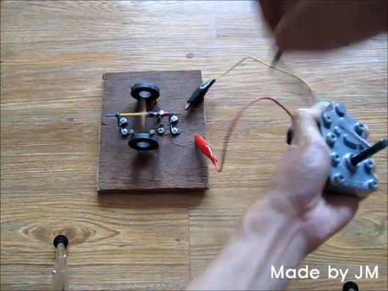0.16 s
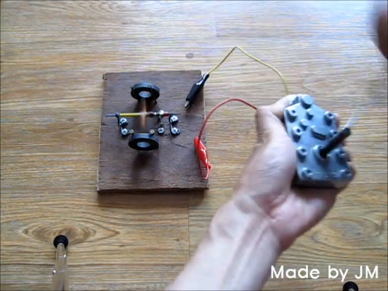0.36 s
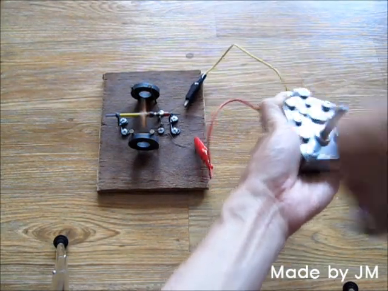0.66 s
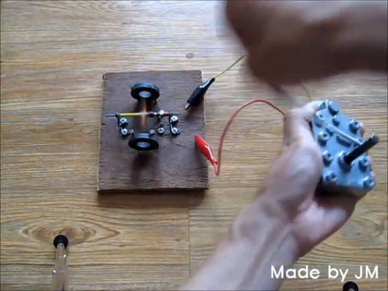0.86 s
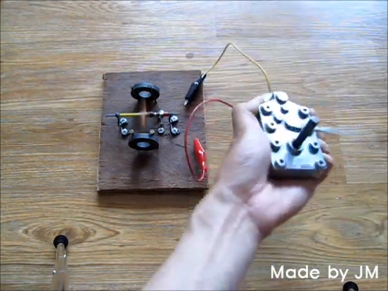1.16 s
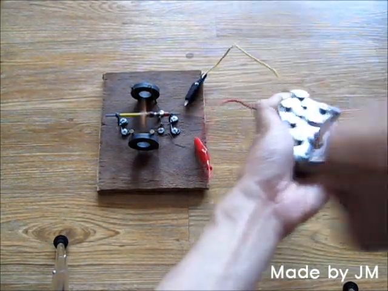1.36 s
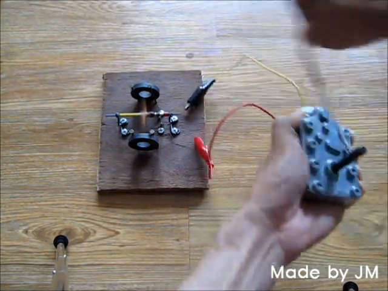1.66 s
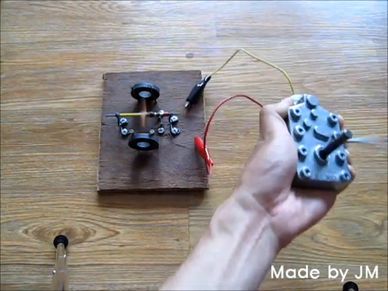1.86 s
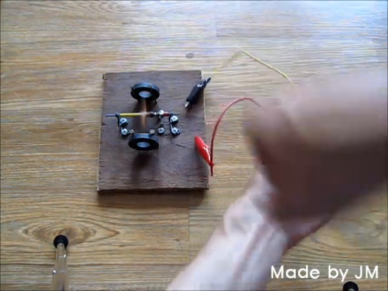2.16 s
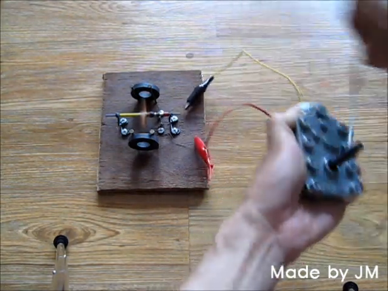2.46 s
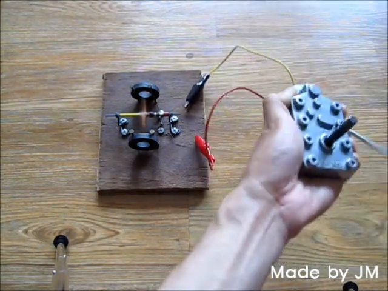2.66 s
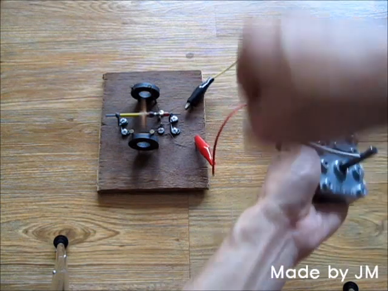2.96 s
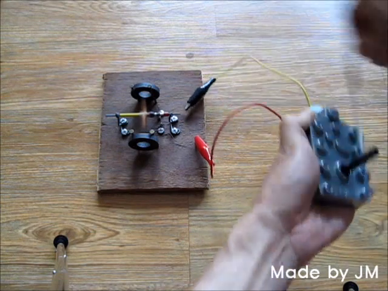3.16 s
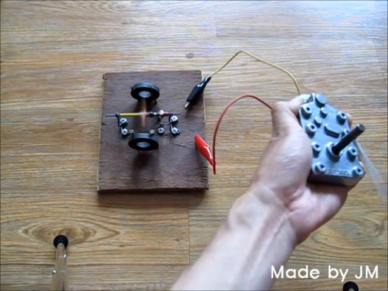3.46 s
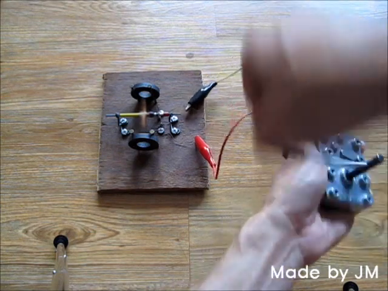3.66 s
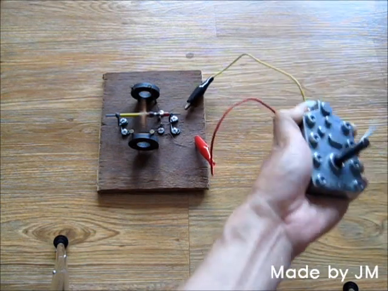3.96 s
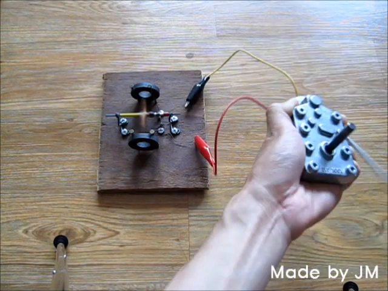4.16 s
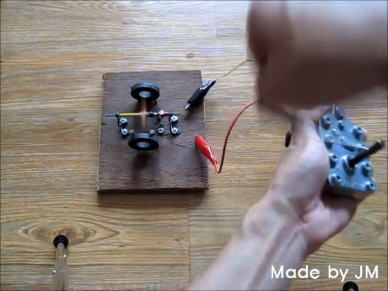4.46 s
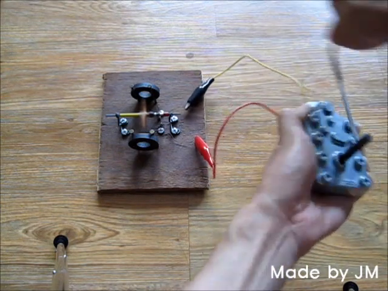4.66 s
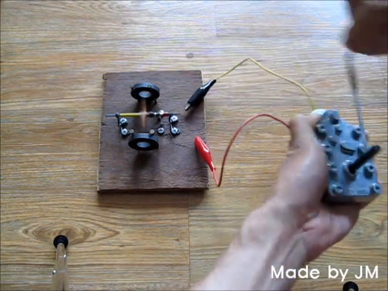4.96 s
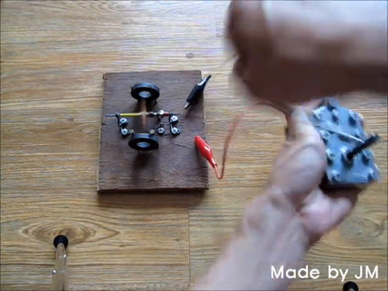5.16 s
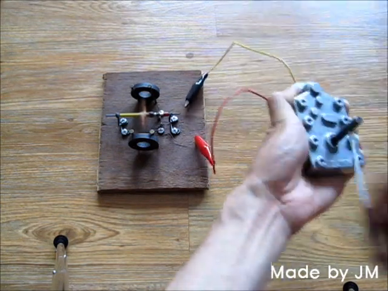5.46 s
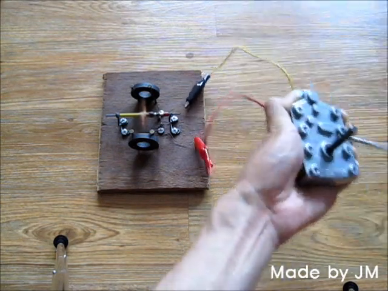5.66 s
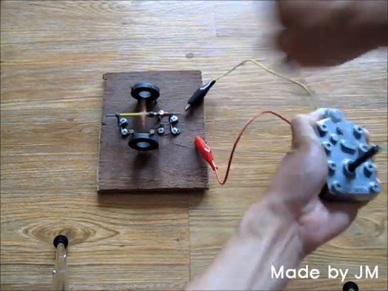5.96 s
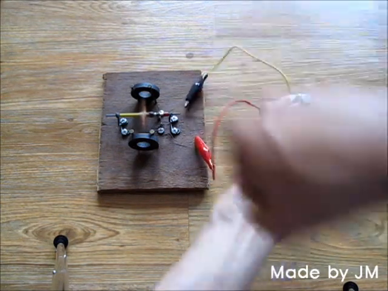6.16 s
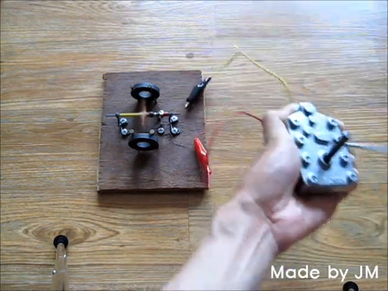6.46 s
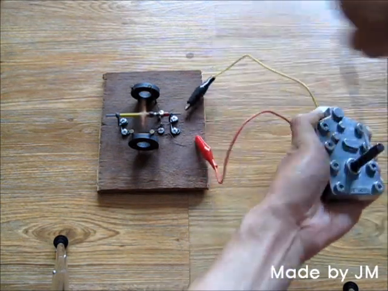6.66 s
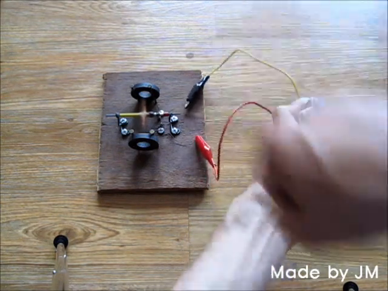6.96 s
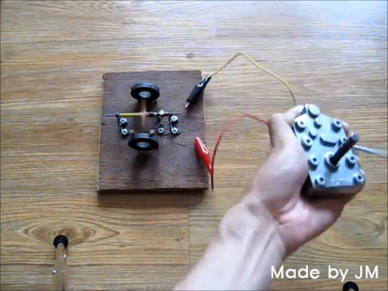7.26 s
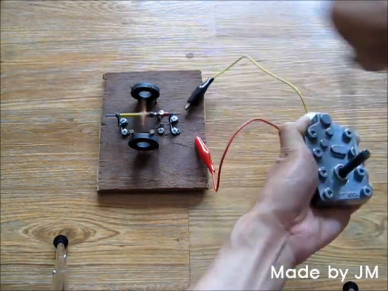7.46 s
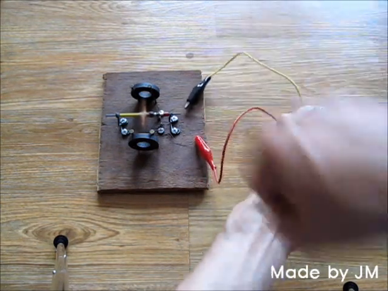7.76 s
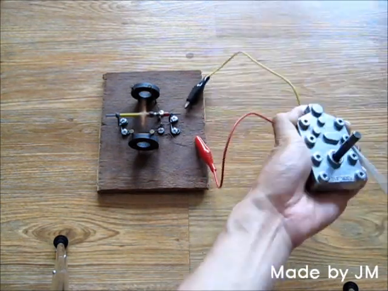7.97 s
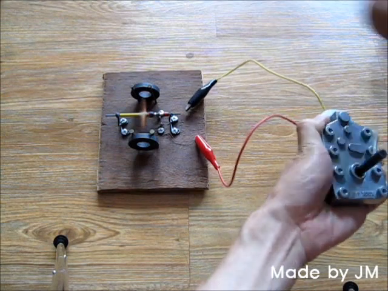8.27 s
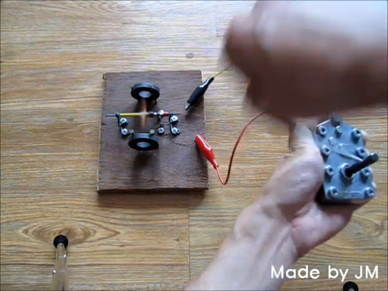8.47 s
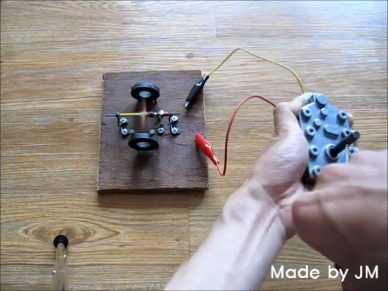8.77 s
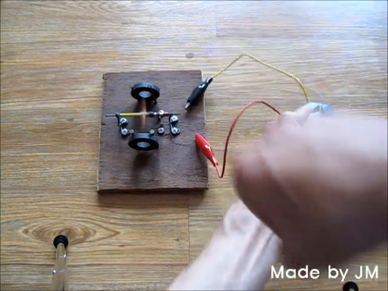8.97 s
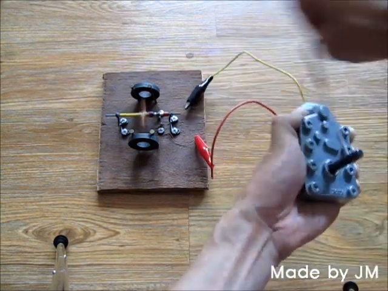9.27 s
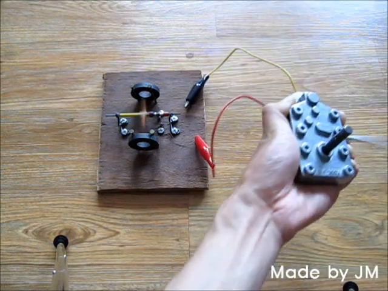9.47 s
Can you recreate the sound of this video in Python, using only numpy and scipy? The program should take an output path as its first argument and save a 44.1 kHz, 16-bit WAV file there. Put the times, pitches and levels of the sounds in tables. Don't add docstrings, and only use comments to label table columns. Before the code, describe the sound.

A small hand-cranked geared motor rattles and whirs up close, gears clattering with a metallic whine, easing off twice, in a quiet room.

```python
import sys
import numpy as np
from scipy import signal
from scipy.fft import rfft, irfft
from scipy.io import wavfile
from scipy.ndimage import uniform_filter1d

SR = 44100
rng = np.random.default_rng(int(sys.argv[2]) if len(sys.argv) > 2 else 0)


def pcm_store(signal):
    levels = np.round(np.clip(np.atleast_2d(signal), -1, 1) * 32767)
    wavfile.write(sys.argv[1], SR, levels.astype(np.int16).T)


def invert_db(level):
    return 10 ** (np.asarray(level, dtype=float) / 20)


N = 423342
REVERSAL_S = 5.2

# frequency in Hz, strength in dB per Hz.
ROOM = [(15, -36), (25, -1.5), (48, -3), (284, -9), (401, -6.5), (549, -9), (741, -7.5), (900, -3),
        (1170, -24), (1980, -120)]
# pitch in Hz, width in Hz, level in dB forward, level in dB backward.
BOARD = [(405.2, 31, -13, -8), (478, 20, -7.5, -16)]
# time in seconds, turns per second, share of smooth sliding noise from 0 to 1.
ROTOR = [(0, 29.4, 0.75), (.4, 31.3, 0.46), (1.2, 33, 0.58), (2.3, 40, 0.64), (4.4, 44.6, 0.5),
         (4.8, 37, 0.55), (5.03, 25.5, .45), (5.25, 24, 0.73), (5.33, 38.8, 0.18), (5.5, 44.4, .41),
         (5.9, 37.6, 0.76), (7.1, 45.4, 0.36), (7.35, 48.8, .58), (7.7, 40.7, 0.54), (8.65, 52.3, 0.47),
         (9.02, 40, 0.43), (9.3, 28, 0.82), (9.6, 25, 0.36)]
# time in seconds, level in dB.
EFFORT = [(0, -29.5), (.35, -25), (.72, -23.5), (1.2, -24), (1.45, -24), (3.33, -24), (3.45, -23.5),
          (4.2, -26), (4.65, -24.5), (5.36, -24), (5.8, -22), (6.35, -24.5), (6.55, -23.5), (7.0, -26),
          (8.3, -25), (8.85, -26.5), (9.45, -32), (9.6, -24.5)]
# lets go at (seconds), fall in seconds, grips again at (seconds),
# rise in seconds, depth in dB.
PAUSES = [
    (4.85, .2, 5.27, .065, -11),
    (8.95, .1, 9.14, .15, -13),
]
# start in seconds, length in seconds, level in dB.
BEARING = [
    (-.1, 0.63, -35),
    (9.358, .1, -33),
    (9.47, .2, -43),
]
# start in seconds, length in seconds,
# tooth rate in Hz at the start, tooth rate in Hz at the end, whine level in dB.
PUSHES_FORWARD = [(0.0, .2, 990, 1012, -29), (.2, .11, 1015, 1058, -29), (.31, .13, 1050, 905, -30),
                  (.46, .12, 893, 915, -29), (.6, .08, 935, 945, -24), (.67, .13, 945, 884, -16),
                  (.8, .13, 884, 965, -22), (.97, .1, 985, 1048, -23), (1.07, .12, 1048, 965, -27),
                  (1.33, .12, 980, 950, -23), (1.42, .15, 928, 955, -18), (1.68, .11, 930, 955, -28),
                  (2.07, .12, 945, 945, -22), (2.18, .14, 895, 915, -20), (2.34, .16, 940, 1010, -30),
                  (2.5, .08, 1010, 960, -31), (2.8, .12, 900, 935, -24), (2.9, .28, 935, 965, -21),
                  (3.61, .14, 980, 905, -20), (3.74, .23, 908, 935, -25), (4.0, .22, 875, 890, -36),
                  (4.24, .1, 888, 862, -23), (4.5, .14, 850, 880, -34), (4.64, .12, 880, 765, -33)]
# start in seconds, length in seconds,
# tooth rate in Hz at the start, tooth rate in Hz at the end, whine level in dB.
PUSHES_BACKWARD = [(5.34, .12, 935, 935, -30), (5.72, .21, 870, 880, -27), (5.95, .13, 860, 885, -39),
                   (6.1, .13, 905, 840, -29.5), (6.44, .23, 890, 870, -28), (6.72, .2, 830, 820, -35),
                   (7.33, .21, 870, 865, -29), (7.6, .2, 840, 840, -31), (8.15, .2, 845, 860, -33),
                   (8.4, .17, 850, 820, -31), (8.62, .3, 780, 740, -48)]
# time in seconds, tooth rate in Hz, level in dB.
COAST = [(5.035, 600, -27), (5.1, 744, -32.5), (5.13, 790, -34), (5.152, 741, -34), (5.168, 730, -25),
         (5.19, 712, -42), (5.21, 707, -29), (5.24, 692, -27), (5.3, 644, -52)]
# time in seconds, tooth rate in Hz, level in dB.
RESTART = [(9.02, 525, -45), (9.16, 728, -40), (9.25, 927, -32), (9.3, 1032, -31), (9.35, 1065, -35),
           (9.4, 1036, -30), (9.45, 1017, -27), (9.48, 1000, -51), (9.6, 939, -24.5)]
# multiple of the tooth rate, level in dB coasting, in dB restarting.
FREE_TEETH = [(2, -3, 0), (3, 0, -1), (4, -2, 0), (5, -7, -2), (6, 2, -4), (7, -7, -3), (8, -5, -2),
              (9, -7, -3), (10, -8, -3), (11, -8, -3), (12, -6, -3), (14, -5, -8)]
# frequency in Hz, level in dB.
FREE_COLOUR = [(1000, -27), (1550, -12), (2120, 0), (2450, -6), (2900, -6), (4500, -12), (6000, -15),
               (11000, -21)]
# place in the turn from 0 to 1, strength in dB.
CONTACTS_FORWARD = [
    (0, -8.5),
    (.3, 7.5),
    (.64, -11.5),
]
# place in the turn from 0 to 1, strength in dB.
CONTACTS_BACKWARD = [
    (0, 2.5),
    (.2, 2.5),
    (.4, -13.5),
    (.6, -2.5),
    (.8, -20),
]
# time in seconds, peak in dB.
CRANK_KNOCKS = [(1.47, -28), (1.704, -10), (1.9942, -5.5), (3.2695, -9), (4.1783, -6.5), (4.2224, -19),
                (4.3472, -24), (4.829, -15), (4.856, -20), (4.883, -16), (4.892, -13), (4.924, -12),
                (4.9747, -9), (5.356, -8), (5.428, -20), (5.511, -19), (6.0148, -6), (7.6419, -10),
                (8.769, -11), (9.543, -20)]
# pitch in Hz, width in Hz, level in dB forward, in dB backward.
CASE = [(1168, 182, -13.5, -14.5), (1308, 107, -15, -12.5), (1562, 71, -5.5, -7), (1831, 103, -1.5, -4.5),
        (1998, 120, -3.5, -5), (2212, 73, -3, -5), (2712, 290, -6, -6), (3133, 180, -2, -0.5),
        (3408, 154, 1, 2), (3770, 160, 2, 0), (4064, 87, -1, -3), (4490, 172, -3.5, -3),
        (5007, 350, -7.5, -9.5), (5360, 320, -4.5, -4.5), (5890, 440, -10.5, -10), (6767, 260, -5, -6),
        (7720, 580, -7, -6.5), (8540, 820, -8.5, -8), (9430, 390, -7, -8), (10100, 330, -12.5, -12.5),
        (11450, 930, -12.5, -12), (12940, 1600, -22.5, -23.5), (14740, 660, -18.5, -20)]


def rms_one(x):
    return x / np.sqrt(np.mean(x ** 2) + 1e-20)


def in_time(rows):
    s, *columns = np.transpose(rows)
    return [np.interp(np.arange(N) / SR, s, c) for c in columns]


def by_way(pair):
    return np.where(np.arange(N) < REVERSAL_S * SR, *pair)


def during(table):
    s = np.arange(N) / SR
    return np.clip(np.minimum(s - table[0][0], table[-1][0] + .02 - s) / .02, 0, 1)


def drift(rate_hz):
    r = np.exp(-2 * np.pi * rate_hz / SR)
    noise = rng.standard_normal(N + SR)
    return rms_one(signal.lfilter([1], [1, -2 * r, r * r], noise)[SR:])


def resonate(x, hz, width_hz):
    r = np.exp(-np.pi * width_hz / SR)
    feedback = [1, -2 * r * np.cos(2 * np.pi * hz / SR), r * r]
    return signal.lfilter(np.array([1, 0, -1]) * (1 - r * r) / 2, feedback, x)


def swells(start, length, db, idle_db):
    bite, swell_db, let_go_db_per_s = .3, 6.5, 273
    s = np.arange(0, N, 32) / SR
    out = idle_db
    for a, d, top in zip(start, length, db):
        below_top = swell_db * np.interp(s, [a, a + bite * d, a + d], [1, 0, 1]) ** 2
        seconds_outside = np.maximum(np.abs(s - a - d / 2) - d / 2, 0)
        out = np.maximum(out, top - below_top - let_go_db_per_s * seconds_outside)
    return np.interp(np.arange(N), np.arange(0, N, 32), out)


def pauses(shares=(1, 1)):
    s = np.arange(N) / SR
    total_db = 0
    for share, (off, fall, on, rise, db) in zip(shares, PAUSES):
        eased = np.clip(np.minimum((s - off) / fall, (on + rise - s) / rise), 0, 1)
        total_db = total_db + share * db * eased
    return total_db


def strokes():
    start, length, from_hz, to_hz, db = np.transpose([*PUSHES_FORWARD, *PUSHES_BACKWARD])
    bulge_hz = np.where(start < REVERSAL_S, 0.095, 29.75)
    s = np.stack([start, start + length / 2, start + length], axis=1).ravel()
    hz = np.stack([from_hz, (from_hz + to_hz) / 2 + bulge_hz, to_hz], axis=1).ravel()
    tooth_hz = np.interp(np.arange(N) / SR, np.maximum.accumulate(s), hz)
    whine_db = swells(start, length, db, idle_db=-48.5) + by_way((-1, -2.5))
    return uniform_filter1d(tooth_hz, size=SR // 40), whine_db


def effort(whine_db):
    smooth_s = 0.19
    load_db = uniform_filter1d(whine_db, size=int(smooth_s * SR)) - by_way((-30.0, -38.0))
    return in_time(EFFORT)[0] + by_way((0.045, 0.072)) * load_db + pauses()


def extra_effort(case_db):
    usual_db = -25
    return case_db - usual_db


def room_tone(case_db):
    hz = np.maximum(np.arange(N // 2 + 1) * SR / N, 1)
    room_hz, room_db = np.transpose(ROOM)
    noise = rfft(rng.standard_normal(N)) * invert_db(np.interp(np.log(hz), np.log(room_hz), room_db))
    upper_share = 1 / (1 + (250 / hz) ** 4)
    deep = rms_one(irfft(noise * (1 - upper_share), N))
    upper = rms_one(irfft(noise * upper_share, N))
    for board_hz, width_hz, *db in BOARD:
        hum = resonate(rng.standard_normal(N), board_hz, width_hz)
        upper = upper + invert_db(by_way(db)) * rms_one(resonate(hum, board_hz, width_hz))
    deep_db = by_way((-60.5, -63)) - pauses((.3, .02))
    upper_db = by_way((-56.5, -57.5)) + 0.41 * extra_effort(case_db)
    return invert_db(deep_db) * deep + invert_db(upper_db) * upper


def reflections(x, t60_s, wet_db):
    t = np.arange(int(.3 * SR)) / SR
    tail = rng.standard_normal(len(t)) * invert_db(-60 * t / t60_s) * (t > .003)
    return invert_db(wet_db) * signal.fftconvolve(x, tail / np.sqrt(np.sum(tail ** 2)))[:N]


def bearing():
    hz, width_hz = 1764, 170
    sing = resonate(resonate(rng.standard_normal(N), hz, width_hz), hz, width_hz)
    return invert_db(swells(*np.transpose(BEARING), idle_db=-51.5)) * rms_one(sing)


def whine(tooth_hz, multiples, levels_db, wobble, flutter_db, first_db, throb, part):
    rotor = 2 * np.pi * np.cumsum(in_time(ROTOR)[0]) / SR
    shaken_hz = tooth_hz * (1 + wobble * drift(42.66))
    phase = (2 * np.pi * np.cumsum(shaken_hz) / SR + throb * np.sin(rotor))[part]
    flutter = drift(98)
    lines = invert_db(levels_db[0] + first_db) * np.sin(phase)
    for k, db in zip(multiples, levels_db):
        own_flutter = np.minimum(np.roll(flutter, k * 9000)[part], 1.5)
        level_db = db + flutter_db * np.sqrt(k / 2) * own_flutter
        lines = lines + invert_db(level_db) * np.sin(k * phase + k * k)
    out = np.zeros(N)
    out[part] = np.sqrt(2) * lines
    return out


def free_whine(table, teeth_db, wobble, flutter_db, throb):
    tooth_hz, level_db = in_time(table)
    part = during(table) > 0
    hz, colour_db = np.transpose(FREE_COLOUR)
    multiples = [round(row[0]) for row in FREE_TEETH]
    levels = []
    for k, db in zip(multiples, teeth_db):
        through_db = np.interp(np.log(k * tooth_hz[part]), np.log(hz), colour_db)
        levels.append(level_db[part] + db + through_db)
    stack = whine(tooth_hz, multiples, levels, wobble, flutter_db, first_db=-22.5, throb=throb, part=part)
    return during(table) * stack


def mesh(tooth_hz, whine_db):
    second_db = whine_db + pauses()
    third_db = by_way((-37.0, -32.0)) + by_way((.4, 1.0)) * (second_db + 30) + pauses()
    fourth_db = second_db + by_way((-27, -15))
    unsteady_hz = tooth_hz * (1 + 0.002855 * drift(12.0))
    loaded = whine(unsteady_hz, (2, 3, 4), [second_db, third_db, fourth_db], wobble=0.00504, flutter_db=2.5,
                   first_db=-29.0, throb=0.23, part=slice(N))
    _, coasting_db, restarting_db = np.transpose(FREE_TEETH)
    coasting = free_whine(COAST, coasting_db, wobble=0.0032, flutter_db=3.5, throb=.14)
    restarting = free_whine(RESTART, restarting_db, wobble=.012, flutter_db=3.0, throb=.35)
    return (1 - during(COAST) - during(RESTART)) * loaded + coasting + restarting


def contacts(turns_per_s, stray_per_s, jitter_s, spread_db, stray_db):
    turn = np.cumsum(turns_per_s) / SR
    places, sizes = [], []
    for pattern, forward in ((CONTACTS_FORWARD, True), (CONTACTS_BACKWARD, False)):
        for place, level_db in pattern:
            at = np.searchsorted(turn, np.arange(int(turn[-1])) + place)
            at = at[(at < REVERSAL_S * SR) == forward]
            places.append(at)
            sizes.append(np.full(len(at), float(level_db)))
    locked = np.concatenate(places)
    luck = rng.standard_normal((2, N))
    locked = np.clip(locked + (jitter_s * SR * luck[0, locked]).astype(int), 0, N - 1)
    strays = np.flatnonzero(rng.random(N) < stray_per_s / SR)
    at = np.concatenate([locked, strays])
    db = np.concatenate(sizes + [np.full(len(strays), stray_db)])
    return at, invert_db(db + spread_db * np.clip(luck[1, at], -2, 2))


def rattle(case_db, burst_s, tick, crowd, patchy_db, knock_db):
    extra_db = np.clip(extra_effort(case_db), -8, 8)
    dull_db = pauses((0.043, 0.13))
    bright_db = -3 - 0.072 * extra_db + dull_db
    top_db = -10.5 - 0.24 * extra_db + 2 * dull_db
    turns_per_s, smooth = in_time(ROTOR)
    smooth = np.clip(smooth, 0, 1)
    stray_per_s = 8.0 * turns_per_s * invert_db(1.1 * np.minimum(extra_db, 0))
    at, size = contacts(turns_per_s, stray_per_s, jitter_s=.0004, spread_db=1.8, stray_db=-5.0)
    knock_s, peak_db = np.transpose(CRANK_KNOCKS)
    knock_at = (knock_s * SR).astype(int)
    hard = np.zeros(N)
    hard[knock_at] = invert_db(peak_db + knock_db - case_db[knock_at])
    fade = np.exp(-1 / (burst_s * SR))
    hard = signal.lfilter([1], [1, -fade ** .5], hard)
    scrape = rng.choice([-1., 1.], N)
    sliding = rng.standard_normal((3, N))
    first_touch = np.isin(np.arange(N), np.concatenate([at, knock_at])) * scrape
    groups = np.zeros((4, N))
    for k, (hz, width_hz, *way_db) in enumerate(CASE):
        blows = np.zeros(N)
        blows[at] = size * invert_db(3 * rng.uniform(-1, 1, N)[at])
        blows = np.tanh(signal.lfilter([1], [1, -fade], blows) / crowd)
        blows = rms_one(blows) + hard
        knocking = blows * scrape + tick * blows * first_touch
        drive = np.sqrt(1 - smooth ** 2) * knocking + smooth * sliding[k % 3]
        grip_db = patchy_db * drift(6.2)
        drive *= invert_db(by_way(way_db) + grip_db)
        group = np.searchsorted([1650, 5000, 9800], hz)
        groups[group] += (-1) ** k * resonate(drive, hz, width_hz)
    low, middle, bright, top = groups / np.std(groups[1])
    low = low * invert_db(1.2 + 0.1 * extra_db)
    return invert_db(case_db + 1.5) * (low + middle + bright * invert_db(bright_db + 2.5) + top * invert_db(top_db + 10.0))


def scene():
    tooth_hz, whine_db = strokes()
    case_db = effort(whine_db)
    gears = bearing() + mesh(tooth_hz, whine_db)
    gears += rattle(case_db, burst_s=0.0017, tick=5.0, crowd=1.26, patchy_db=0.5, knock_db=-8.5)
    no_bass = signal.butter(4, 1020, "high", fs=SR, output="sos")
    gears = signal.sosfilt(no_bass, gears)
    return (room_tone(case_db) + reflections(gears, t60_s=0.22, wet_db=-14.0) + gears)[None]


def roll_off(x):
    return signal.sosfilt(signal.butter(12, 16030, fs=SR, output="sos"), x)


def record(dry):
    rounded = .7 * np.tanh(dry / .7)
    top_cut = signal.cheby2(12, 50, 15900, fs=SR, output="sos")
    finished = signal.sosfilt(top_cut, rounded)
    return roll_off(finished)


dry = scene()
out = record(dry)
pcm_store(out)
```